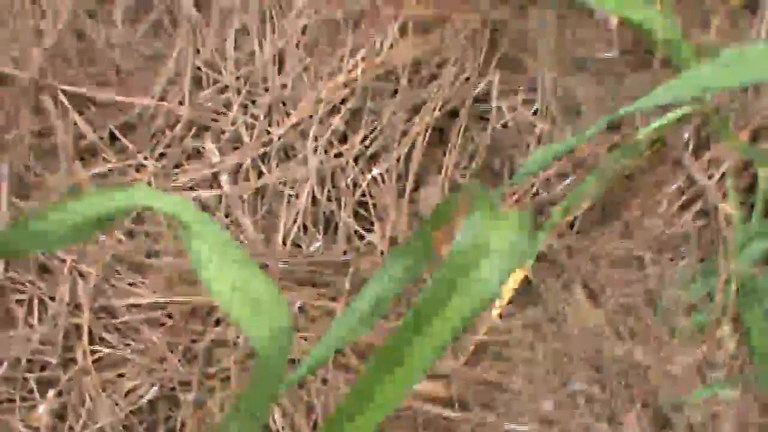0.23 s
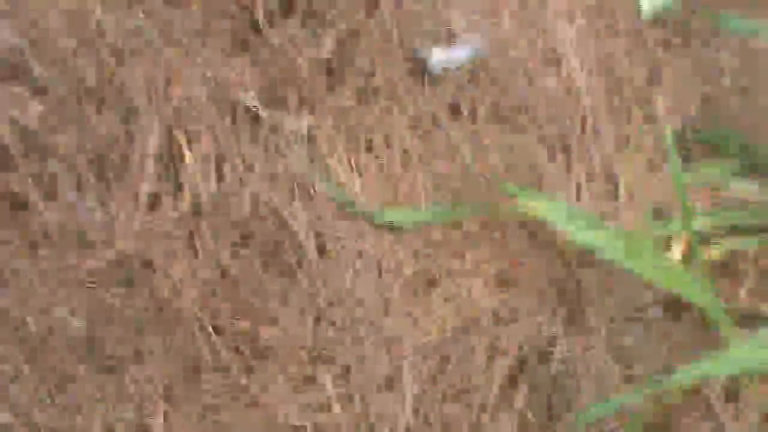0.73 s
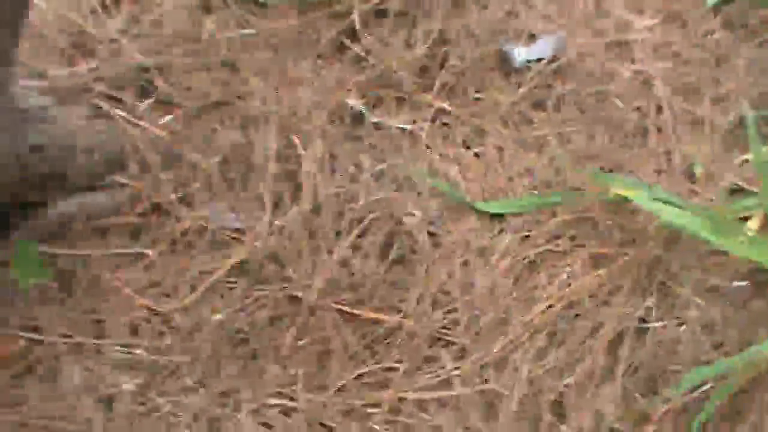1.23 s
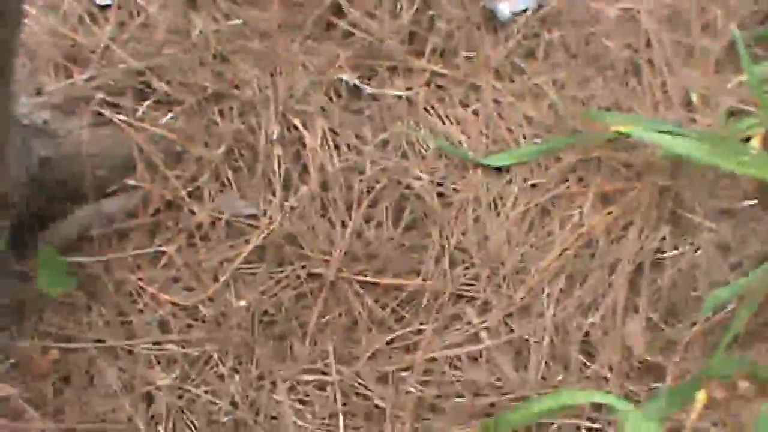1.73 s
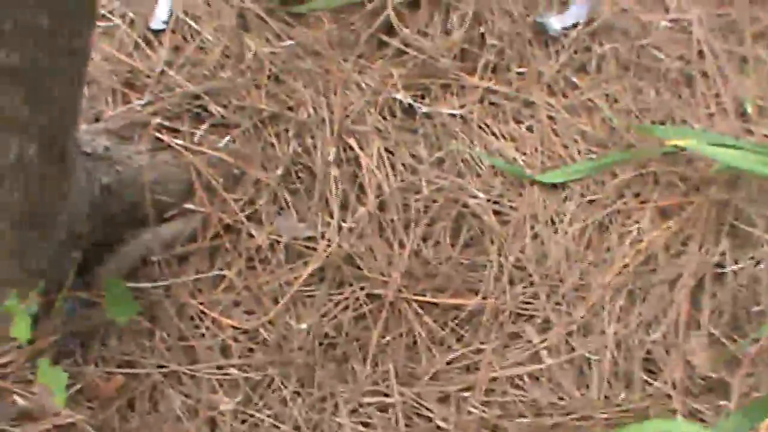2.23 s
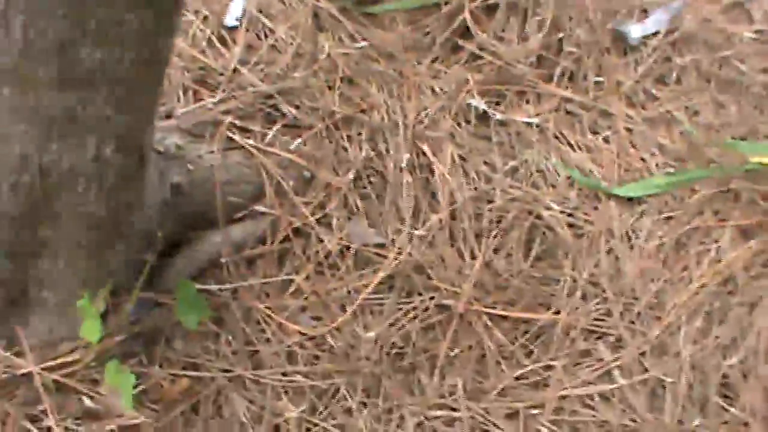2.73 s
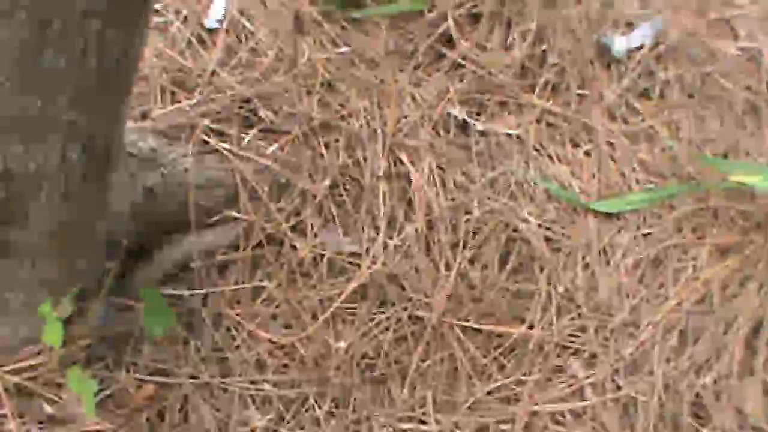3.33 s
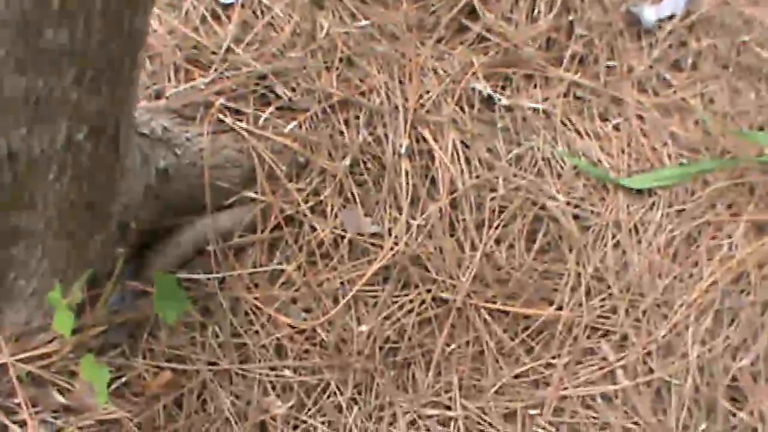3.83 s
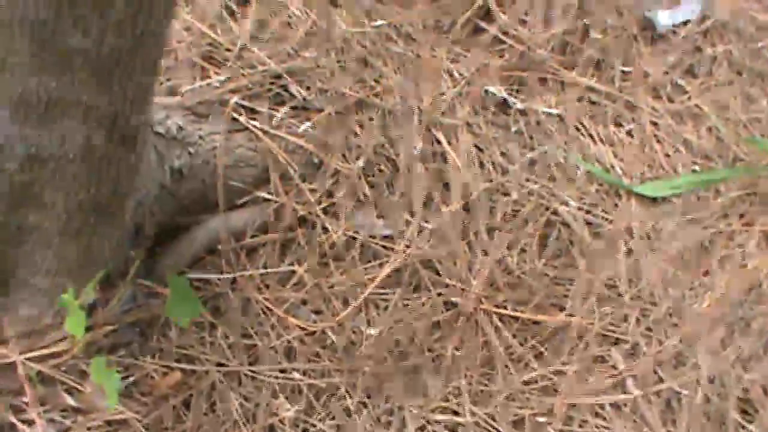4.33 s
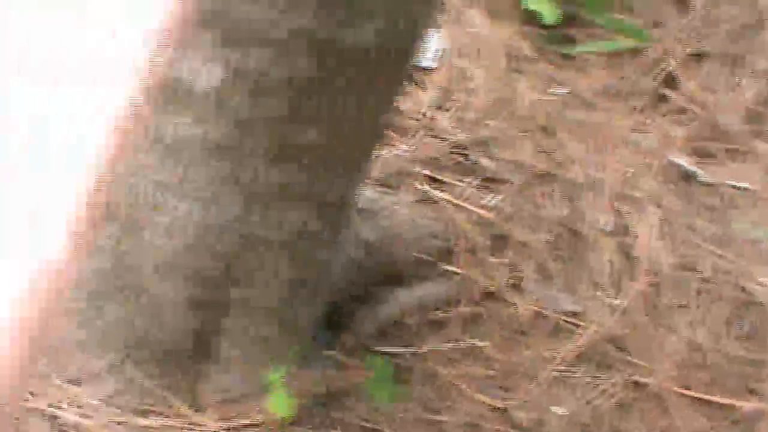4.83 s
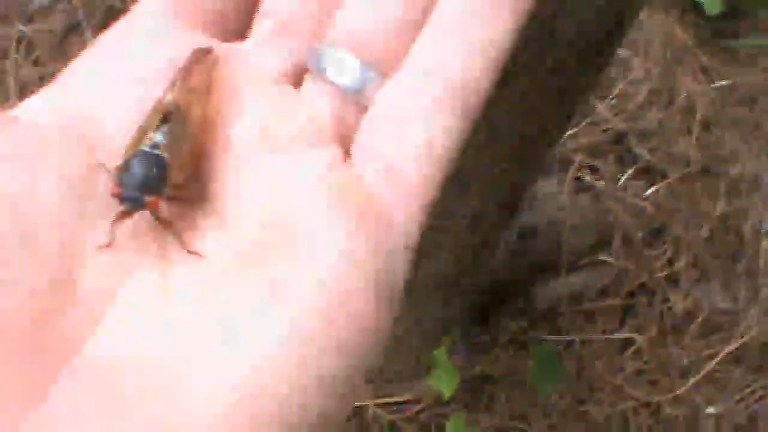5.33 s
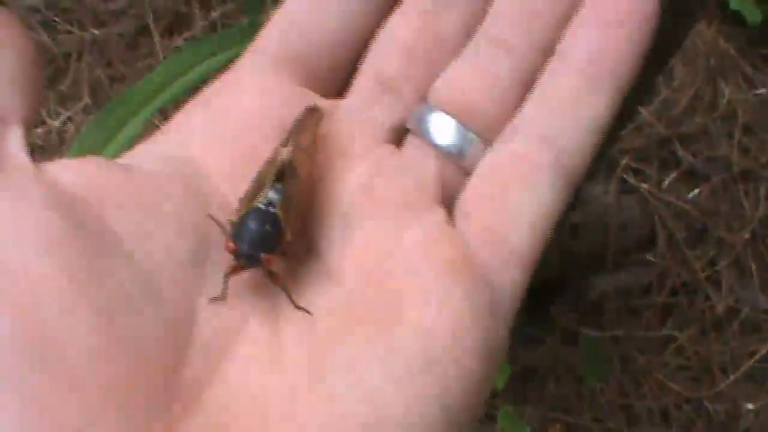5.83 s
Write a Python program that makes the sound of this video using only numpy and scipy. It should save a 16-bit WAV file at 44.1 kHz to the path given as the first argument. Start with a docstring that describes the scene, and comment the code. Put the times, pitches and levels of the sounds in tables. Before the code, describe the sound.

Throughout, many distant cicadas merge into a steady, hollow drone around one kilohertz, shimmering and beating irregularly without separate calls. Under it lie a soft open-air traffic wash, a low throbbing engine idle and a faint second engine whose hum rises and falls. Light close hiss opens the scene, and a soft fabric slide swishes past around 0.35 seconds. From about 0.7 seconds, dry needles and grass are brushed in short scratchy strokes. Between 1.1 and 2.6 seconds, bright brittle snaps come thickly, the loudest crackling into overload. Two more cracks come near 3.0, then smaller rustles thin out until about 3.7, with one weak tick. Afterwards the close sound nearly vanishes and the drone dominates. The second engine swells around 4.6 and 5.5. A very faint buzz appears after 4.5, and a thin high insect whine emerges just before the end at six seconds.

```python
"""Woodland by day: periodical cicadas drone in the trees above a bed of dry pine needles.
The drone is noise shaped to a narrow pitch band, so it beats by chance like a crowd of voices.
Close up, a piece of fabric slides past (noise through resonances), then needles and grass are brushed in
short strokes (coloured random slips) and snap (ringing cracks). Far off, one engine idles while another
rises and falls (sums of sines), in an open-air wash with a faint buzz and an insect whine (shaped noise)."""
import sys
import numpy as np
from scipy import signal
from scipy.fft import rfft, irfft
from scipy.io import wavfile
from scipy.ndimage import uniform_filter1d

SR = 44100
rng = np.random.default_rng(int(sys.argv[2]) if len(sys.argv) > 2 else 0)


def int16_out(signal):
    """Quantize to a 16-bit WAV file."""
    q = np.round(np.clip(np.atleast_2d(signal).T, -1, 1) * 32767)
    wavfile.write(sys.argv[1], SR, q.astype(np.int16))


N = 267951
TIME = np.arange(N) / SR  # s
FREQS = np.fft.rfftfreq(N, 1 / SR)  # Hz

# Levels here are before each source's own trim; spectra are relative, level/dB per Hz.
# spectrum of all the cicadas together: [f/Hz, level/dB]
CHORUS_SPECTRUM = [(600, -47), (800, -30.5), (880, -20), (950, -8.5), (1010, -9.5), (1050, -1.5),
                   (1085, -0.5), (1115, -1.5), (1150, -6), (1210, -12), (1300, -20.5), (1450, -28),
                   (1900, -43.5), (3000, -88)]
# loudness of the cicada chorus: [t/s, level/dB]
CHORUS_LEVEL = [(0, -25.5), (2.2, -24.5), (3.0, -26.5), (3.8, -24.5), (4.4, -26.5), (6.08, -26)]
# needles that snap: [t/s, level/dB rms over a millisecond, ring f/Hz]
SNAPS = [(.716, -24, 2900), (1.059, -13.5, 5000), (1.1436, -7.5, 8650), (1.183, -15, 4700),
         (1.2253, -5.5, 4960), (1.2425, -17, 7900), (1.2927, -19, 4000), (1.5053, -4.5, 7160),
         (1.6295, -8.5, 6550), (1.6704, -16, 5800), (1.842, -6.5, 5270), (1.9252, -5, 3400),
         (2.1068, -9.5, 7800), (2.1384, -7.5, 7300), (2.162, -10.5, 8000), (2.1662, -13, 4600),
         (2.224, -5.5, 4900), (2.261, -8.5, 8150), (2.386, -6, 4410), (2.429, -8, 5040),
         (2.4975, -15, 4780), (2.5831, -11.5, 4400), (2.6305, -15, 5680), (2.9624, -13, 4100),
         (2.985, -10, 9200), (3.7302, -25, 2470)]
# strokes through the needles: [peak t/s, level/dB, length t/s, brightness/dB]
STROKES = [(.899, -18.5, 0.011, 9), (.946, -23.5, 0.016, 0), (1.013, -22.5, 0.05, 5),
           (1.081, -21.5, 0.033, 2.5), (1.138, -24, 0.0099, 5), (1.213, -28, 0.018, 1),
           (1.328, -22, 0.025, 2.5), (1.506, -13, 0.0085, 2), (1.543, -21, 0.0078, 1),
           (1.574, -24, 0.013, 2), (1.673, -17, 0.019, 5.5), (1.808, -21, 0.018, 1),
           (1.879, -19, 0.019, -1.5), (1.957, -27, 0.032, 3), (2.107, -21.5, .018, 5),
           (2.183, -29, 0.02, 2), (2.277, -22, 0.037, -4), (2.344, -19, 0.015, -3),
           (2.44, -22.5, 0.022, -10), (2.529, -25.5, 0.025, 0), (2.6, -25, 0.015, 3),
           (2.635, -23, 0.011, 2), (2.753, -31, 0.024, 14), (2.883, -22, 0.017, 8),
           (2.962, -21.5, .014, -3), (3.005, -21.5, 0.032, 5), (3.193, -21, 0.0099, 4),
           (3.271, -23.5, .022, 1), (3.399, -29.5, 0.0089, 7), (3.512, -29.5, 0.027, 7),
           (3.609, -24.5, 0.02, 7)]
# resonances of the sliding fabric: [f/Hz, width f/Hz, level/dB]
FABRIC_RESONANCES = [(3570, 280, -14.5), (5000, 520, -7), (5960, 620, 0.5)]
# light steady brushing: [t/s, level/dB, brightness/dB]
BRUSHING = [(0, -32.5, 1), (.24, -37, -2), (.44, -31.5, 6), (.7, -37, 0), (.87, -38.5, -2), (1.3, -39, -5),
            (1.75, -38.5, -3), (2.05, -44.5, -7), (2.8, -41, -4), (3.15, -36, 0.5), (3.35, -41, 1),
            (3.62, -38.5, -8), (3.77, -43, 10), (3.84, -49.5, -17), (4.5, -48, -15), (5.1, -45.5, -2),
            (5.3, -50, -15), (6.08, -45, -17)]
# spectrum of dry needles and grass: [f/Hz, level/dB]
NEEDLE_SPECTRUM = [(300, -10), (1200, -7.5), (2000, -4.5), (3200, -2), (4600, -0.5), (5600, 0), (6700, -2),
                   (7700, 0.5), (8700, -1.5), (10000, -6.5), (10900, -10), (12000, -24.5)]
# lines of the idling engine, and one further line between them: [f as a ratio to the engine cycle, level/dB]
IDLE_ORDERS = [(11, -3.5), (12, 0.5), (13, -0.5), (13.66, 0), (14, -7), (15, -2.5), (17, -4.5), (20, -7),
               (31, -12.5)]
# loudness of the idling engine: [t/s, level/dB]
IDLE_LEVEL = [(0, -32), (1, -39.5), (2, -34), (2.6, -32.5), (3.1, -31), (4.3, -30.5), (4.8, -35),
              (5.5, -33), (6.08, -32)]
# pitch and loudness of the far engine: [t/s, f/Hz, level/dB]
ENGINE_RUN = [(0, 191.3, -39.5), (1.1, 196.6, -40), (1.7, 196, -47), (2.25, 177, -39.5), (2.5, 208, -32.5),
              (2.85, 219.8, -36.5), (3.35, 212.5, -33.5), (3.8, 207.5, -52), (4.6, 207, -33),
              (4.9, 217.5, -40), (5.5, 226, -34.5), (6.08, 222.5, -45.5)]
# orders of the far engine: [multiple of its pitch, level/dB]
ENGINE_ORDERS = [(1, 0), (2, -10.5), (3, -14)]
# spectrum of distant traffic and open air: [f/Hz, level/dB]
AIR_SPECTRUM = [(10, -24), (30, -22), (60, -1.5), (130, -3), (165, -3), (290, 0), (400, -8.5), (540, -11),
                (720, -7.5), (1400, -16.5), (2700, -25.5), (4500, -34), (8700, -29), (11000, -34.5)]
# loudness of that wash: [t/s, level/dB]
AIR_LEVEL = [(0, -32.5), (.8, -32.5), (1.6, -30.5), (2.2, -33), (3, -31.5), (4, -31.5), (4.8, -31.5),
             (5.4, -31), (6.08, -32)]
# resonances of the faint far buzz: [f/Hz, width f/Hz, level/dB]
BUZZ_RESONANCES = [(1830, 260, 0), (2380, 120, -4), (3620, 130, -9)]
# loudness of the buzz: [t/s, level/dB]
BUZZ_LEVEL = [(4.2, -75), (4.65, -52), (4.9, -54), (5.2, -59), (5.6, -52), (5.9, -46.5), (6.08, -49)]
# resonances of the thin insect whine: [f/Hz, width f/Hz, level/dB]
WHINE_RESONANCES = [(6712, 15, -2), (6640, 260, 0)]
# loudness of the whine: [t/s, level/dB]
WHINE_LEVEL = [(5.4, -78), (5.7, -63), (5.9, -54), (6.08, -55)]
# stereo width of far sounds: [f/Hz, side against middle level/dB]
FAR_WIDTH = [(30, -31), (110, -40), (200, -31), (280, -22), (400, -15), (700, -13.5), (1100, -9.2),
             (2200, -7.5), (3500, -10), (5000, -22), (9000, -50)]
# stereo width of the brushing and the fabric: [f/Hz, side against middle level/dB]
SOFT_WIDTH = [(2000, -50), (6000, -52), (8500, -29), (9800, -18), (11000, -3)]
# stereo width of strokes and snaps: [f/Hz, side against middle level/dB]
NEAR_WIDTH = [(2000, -17), (5500, -14), (8000, -10), (9200, -3), (10500, 0)]
# lean of close sounds between the two ports: [f/Hz, left minus right level/dB]
NEAR_LEAN = [(1500, 4), (4500, 0.1), (7300, 3.5), (8200, -3), (8850, -5), (9300, 4), (9800, 19)]

RISE_SHARE, STROKE_SHAPE = 0.44, 1.53  # share of a stroke's length spent building; curve exponent
# each snap jolts its neighbours into a short crunch, set against the snap's level
CRUNCH_DB, CRUNCH_RISE_S, CRUNCH_FALL_S = -11.5, 0.0022, 0.0036
# the fabric slides past once
SLIDE_S, SLIDE_DB, SLIDE_RISE_S, SLIDE_FALL_S = 0.35, -26.5, 0.053, 0.11
IDLE_HZ = 8.72  # engine cycle rate
EDGE_HZ = 10950  # top of the recorded band


def amp(db):
    """Decibels to gain."""
    return 10 ** (np.asarray(db) / 20)


def unit(x):
    """Scales to an rms of one."""
    return x / np.sqrt(np.mean(x ** 2) + 1e-20)


def at_hz(points, hz=FREQS):
    """Reads (Hz, value) points on a log-frequency axis."""
    f, value = np.transpose(points)
    return np.interp(np.log(hz + 1), np.log(f), value)


def curves(rows):
    """Every column of a timed table, sample by sample."""
    s, *columns = np.transpose(rows)
    return [np.interp(TIME, s, column) for column in columns]


def add(mix, s, sound):
    """Mixes a sound in at time s."""
    part = mix[..., max(round(s * SR), 0):][..., :sound.shape[-1]]
    part += sound[..., :part.shape[-1]]


def white():
    """Two unrelated noises."""
    return rng.standard_normal((2, N))


def drift(rate_hz):
    """Slow random movement with an rms of one."""
    return unit(irfft(rfft(rng.standard_normal(N)) * np.exp(-FREQS / rate_hz), N))


def wavering(depth, rate_hz):
    """A gain near one that drifts as the air moves."""
    return 1 + depth * drift(rate_hz)


def swell(s, rise_s, fall_s, shape):
    """Power that builds to one at time s and dies away."""
    power = np.zeros(N)
    near = (TIME > s - 8 * rise_s) & (TIME < s + 8 * fall_s)
    lag = TIME[near] - s
    span = np.where(lag < 0, rise_s, fall_s)
    power[near] = np.exp(-abs(lag / span) ** shape)
    return power


def colour(pair, gain, width):
    """Filters two unrelated signals into the middle and side of a left-right pair."""
    common, apart = rfft(pair) * gain
    mid = irfft(common, N)
    side = irfft(apart * amp(at_hz(width)), N)
    return np.array([mid + side, mid - side]) / mid.std()


def resonances(modes):
    """Gain of a few steep-sided resonances, each holding its own share of the power."""
    power = 0
    for hz, width, db in modes:
        offset = (FREQS - hz) / width * 2
        power = power + amp(db) ** 2 / width / (1 + offset ** 2) ** 2
    return np.sqrt(power)


def brighten(x, bright_db, split_hz=5500):
    """Tips the balance between upper and lower treble, roughly keeping the power."""
    low = irfft(rfft(x) / (1 + (FREQS / split_hz) ** 4), N)
    tip = amp(bright_db / 2)
    tipped = low / tip + (x - low) * tip
    return tipped / np.sqrt((tip ** 2 + tip ** -2) / 2)


def chorus(level_db=0.33):
    """Thousands of far voices near one pitch merge like narrow-band noise, a drone that beats by chance."""
    drone = colour(white(), amp(at_hz(CHORUS_SPECTRUM)), FAR_WIDTH)
    return drone * amp(curves(CHORUS_LEVEL)[0] + level_db)


def snaps(level_db=-1, bright_db=5.5, bright_db_per_octave=5, crack_s=0.00024, tail_s=0.0046,
          tail_db=-17, ring_db=8, ring_width_hz=600, pivot_hz=5200):
    """A needle lets go: a sharp crack with a faint tail rings at its own pitch; high needles are brighter."""
    size, lead = 1024, 64  # samples
    t = (np.arange(size) - lead) / SR
    hz = np.fft.rfftfreq(size, 1 / SR)
    out = np.zeros((2, N))
    fade = (t >= 0) * (np.exp(-abs(t) / crack_s) + amp(tail_db) * np.exp(-abs(t) / tail_s))
    octaves = np.log2(np.clip(hz, 1500, 9000) / pivot_hz)
    side_gain = amp(at_hz(NEAR_WIDTH, hz))
    for s, db, ring_hz in SNAPS:
        ring = 1 + amp(ring_db) / (1 + 2j * (hz - ring_hz) / ring_width_hz)
        tip_db = bright_db + bright_db_per_octave * np.log2(ring_hz / pivot_hz)
        gain = ring * amp(at_hz(NEEDLE_SPECTRUM, hz) + 0.5 * tip_db * octaves)
        common, apart = rfft(rng.standard_normal((2, size)) * fade) * gain
        mid, side = irfft(common), irfft(apart * side_gain)
        crack = np.array([mid + side, mid - side]) / np.linalg.norm(mid)
        # unit energy becomes an rms of one over a millisecond
        add(out, s - lead / SR, crack * amp(db + level_db) * np.sqrt(SR / 10 ** 3))
    return out


def friction(width, slips_per_s, spread_db, hiss, tint_db):
    """Tiny slips of uneven size over a fine hiss, coloured by the dry needles."""
    size = amp(spread_db * np.minimum(rng.exponential(1, N), 3))
    slipping = rng.random(N) < slips_per_s / SR
    slips = unit(rng.choice([-1, 1], (2, N)) * size * slipping)
    z = signal.stft(slips + hiss * white(), nperseg=256, noverlap=192)[2]
    # the needles in contact keep changing, each favouring its own pitches
    patches = uniform_filter1d(rng.standard_normal(z.shape[1:]), size=3, axis=0)
    tint = unit(uniform_filter1d(patches, size=12, axis=1))
    tinted = signal.istft(z * amp(tint_db * tint), nperseg=256, noverlap=192)[1][:, :N]
    return colour(tinted, amp(at_hz(NEEDLE_SPECTRUM)), width)


def strokes(level_db=-0.5, bright_db=-1, catch_db=2.6, catch_hz=90):
    """Each stroke presses more needles into slipping, then lets them go; they catch unevenly on the way."""
    power, tone = np.full(N, 1e-12), np.zeros(N)
    for s, db, length, tip_db in STROKES:
        rise_s, fall_s = RISE_SHARE * length, (1 - RISE_SHARE) * length
        press = amp(db) ** 2 * swell(s, rise_s, fall_s, STROKE_SHAPE)
        power += press
        tone += press * tip_db
    for s, db, _ in SNAPS:
        power += amp(db + CRUNCH_DB) ** 2 * swell(s, CRUNCH_RISE_S, CRUNCH_FALL_S, STROKE_SHAPE)
    grains = friction(NEAR_WIDTH, slips_per_s=1500, spread_db=5.5, hiss=0.6, tint_db=4.5)
    rustle = brighten(grains, tone / power + bright_db)
    return rustle * np.sqrt(power) * amp(level_db + catch_db * drift(catch_hz))


def fabric():
    """A piece of fabric slides past close up: a soft resonant hiss, noise through a few broad resonances."""
    slide = np.sqrt(swell(SLIDE_S, SLIDE_RISE_S, SLIDE_FALL_S, shape=2.4))
    return colour(white(), resonances(FABRIC_RESONANCES), SOFT_WIDTH) * slide * amp(SLIDE_DB)


def close_by(pair):
    """Leans a close sound towards one port or the other, band by band."""
    left = amp(at_hz(NEAR_LEAN))
    lean = irfft(rfft(pair.mean(0)) * (left - 1) / (left + 1), N)
    return pair + np.array([lean, -lean])


def brushing(level_db=1.5):
    """Light contact keeps up a soft, fine-grained hiss."""
    db, bright_db = curves(BRUSHING)
    grains = friction(SOFT_WIDTH, slips_per_s=2500, spread_db=9.5, hiss=1.32, tint_db=2.5)
    return brighten(grains, bright_db) * amp(db + level_db)


def idling(level_db=0.5, waver=0.44):
    """Unequal cylinders put lines at multiples of the engine cycle, which beat into a low throb; one further
    line sits between them."""
    lines = np.zeros(N)
    for k, db in IDLE_ORDERS:
        tone = np.sin(2 * np.pi * (k * IDLE_HZ * TIME + rng.random()))
        lines += amp(db) * wavering(waver, rate_hz=1.95) * tone
    return unit(lines) * amp(curves(IDLE_LEVEL)[0] + level_db)


def engine(level_db=-1, waver=0.21):
    """Only the lowest orders carry this far; the moving air makes them waver."""
    hz, db = curves(ENGINE_RUN)
    turn = 2 * np.pi * np.cumsum(hz) / SR
    orders = np.zeros(N)
    for k, order_db in ENGINE_ORDERS:
        orders += amp(order_db) * wavering(waver, rate_hz=15.0) * np.sin(k * turn)
    return np.sqrt(2) * amp(db + level_db) * orders


def distance():
    """Open-air wash, a faint buzz and one thin insect whine, each a noise through its own spectrum."""
    layers = [(amp(at_hz(AIR_SPECTRUM)), AIR_LEVEL),
              (resonances(BUZZ_RESONANCES), BUZZ_LEVEL),
              (resonances(WHINE_RESONANCES), WHINE_LEVEL)]
    return sum(colour(white(), gain, FAR_WIDTH) * amp(curves(level)[0]) for gain, level in layers)


def scene():
    """Fabric, strokes and snaps lean between the sides; chorus and distance spread; engines sit centred."""
    near = close_by(snaps() + strokes() + fabric()) + brushing()
    far = idling() + engine() + distance()
    return chorus() + near + far


def record(dry):
    """The sharpest peaks overload the recorder and clip; then a low-pass limits the band."""
    low_pass = signal.firwin(511, EDGE_HZ, window=("kaiser", 8), fs=SR)
    return signal.oaconvolve(np.clip(dry, -0.8, 0.8), low_pass[None], "same")


dry = scene()
out = record(dry)
int16_out(out)
```